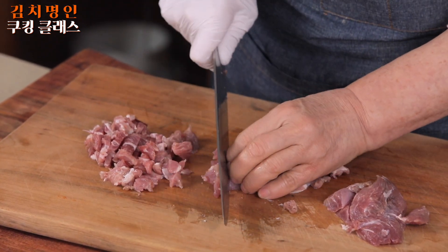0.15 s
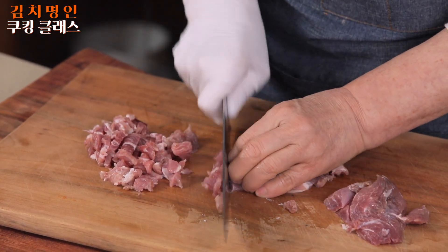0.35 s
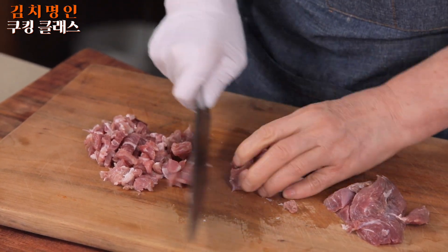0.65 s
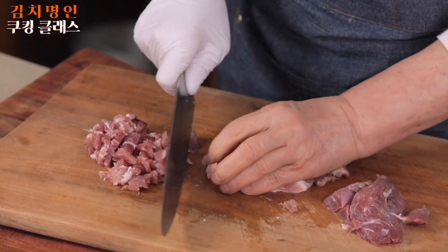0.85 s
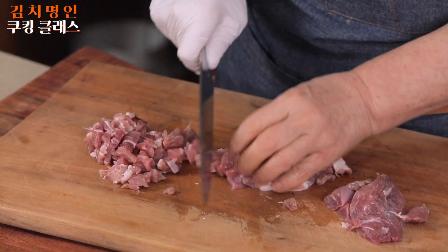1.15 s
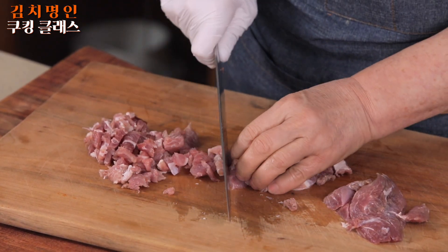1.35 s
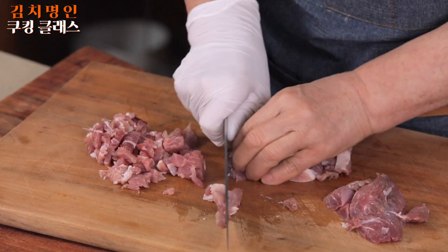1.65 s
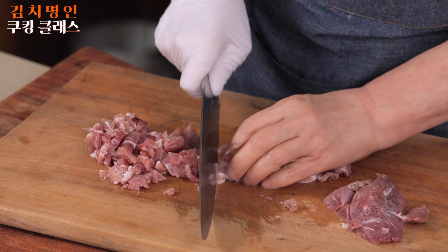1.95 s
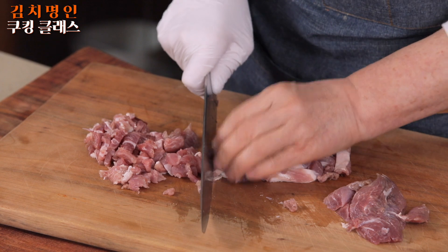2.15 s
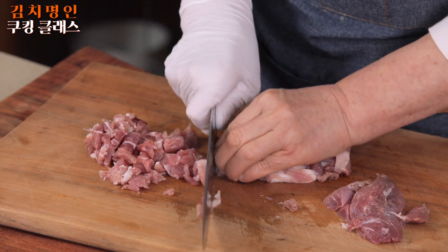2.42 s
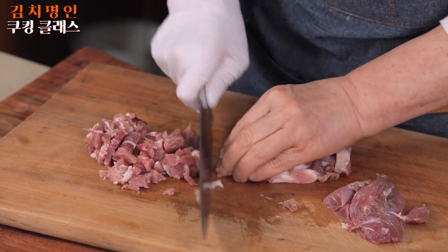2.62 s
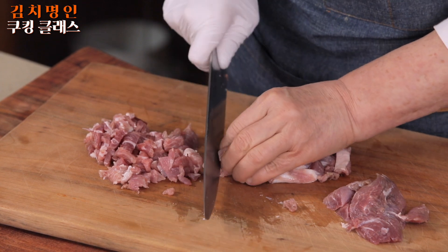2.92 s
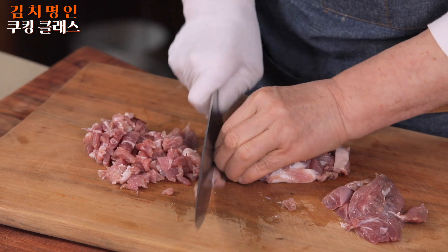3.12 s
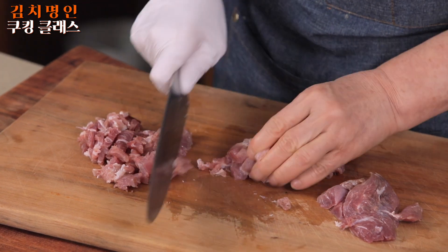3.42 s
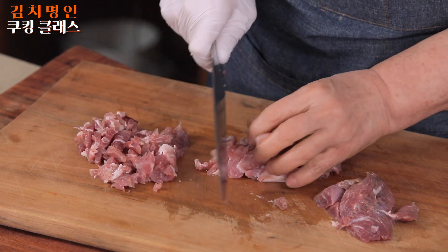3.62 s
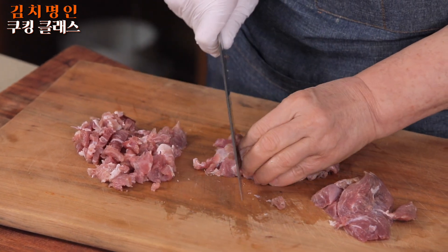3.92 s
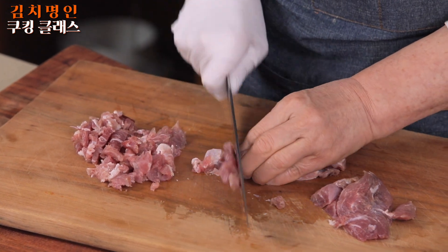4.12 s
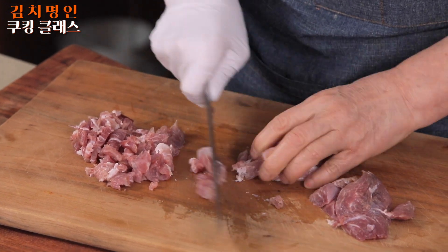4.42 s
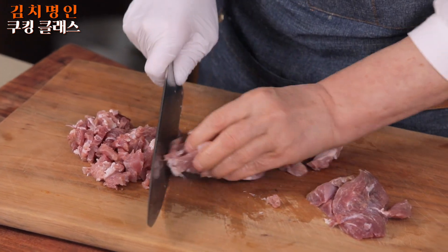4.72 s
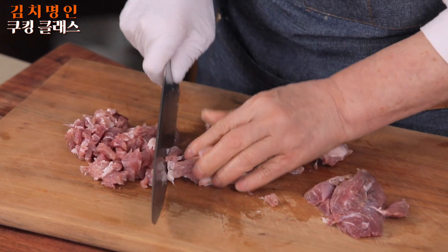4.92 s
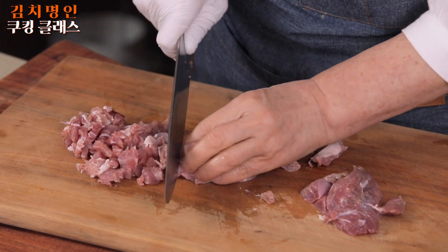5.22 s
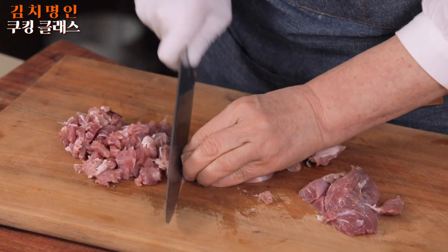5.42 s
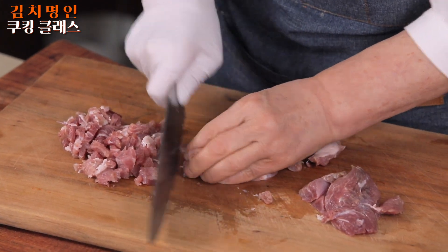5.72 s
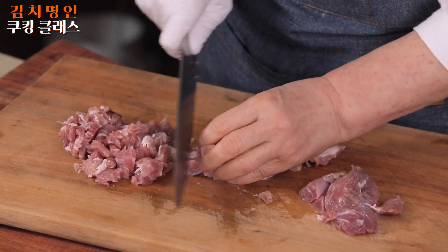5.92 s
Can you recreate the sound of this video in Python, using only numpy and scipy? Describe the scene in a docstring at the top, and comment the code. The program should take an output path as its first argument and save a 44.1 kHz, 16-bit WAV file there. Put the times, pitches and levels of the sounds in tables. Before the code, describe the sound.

Separate knife strokes on a wooden cutting board, miked closely with a short indoor reverberation. Each stroke sinks through soft meat with a slight crackle, knocks woodily, then drags roughly over the grain. Between the firm blows come light taps and gritty scrapes pushing pieces aside, some with a thin steely hiss. Soft ventilation air fills the gaps, including a long one before the last cut.

```python
"""A small kitchen, close up and almost mono: a cook dices raw meat on a thick wooden board.
Knocks ring the damped modes of the board, and the table answers with low thuds.
The blade rasps through meat and scrapes back: trains of tiny slips shake the wood and the steel.
Wet meat ticks and crackles in filtered noise; ventilation murmurs behind as noise and wavering tones."""
import sys
import numpy as np
from scipy import signal
from scipy.fft import rfft, irfft
from scipy.io import wavfile
from scipy.ndimage import map_coordinates

SR = 44100
rng = np.random.default_rng(int(sys.argv[2]) if len(sys.argv) > 2 else 0)


def unload_wav(signal):
    """Save mono or channel-first audio to the path in sys.argv[1] as 16-bit WAV at rate SR, clipped to [-1, 1]."""
    wavfile.write(
        sys.argv[1],
        SR,
        np.round(np.clip(np.atleast_2d(signal).T, -1, 1) * 32767).astype(np.int16),
    )


N = 267246  # length in samples

# Spectrum of the ventilation air. Each row: frequency in Hz, relative density in dB.
AIR_SPECTRUM = [(25, -3.5), (90, -9.5), (200, -11.5), (400, -7.5), (700, -9.5), (1300, -9.5), (1900, -20),
                (4000, -23), (15500, -24.5)]
# Ventilation tones. Each row: centre frequency in Hz, relative level in dB.
FAN_TONES = [(118.4, -83), (339.1, -80.5), (699.8, -72), (952.8, -78.5), (1357, -80)]
# Early reflections from the worktop and the cook's body. Each row: delay in seconds, level in dB.
ECHOES = [(.0053, -15.5), (.0107, -13.5)]
# Modes of the table under the board. Each row: frequency in Hz, level in dB, T60 in seconds.
TABLE_MODES = [(39.2, -6.5, 0.2), (69, 1, 0.11), (87, -3, 0.073), (164, -4.5, 0.065)]
# Modes of the board. Each row: nominal frequency in Hz, nominal level in dB, T60 in seconds.
BOARD_MODES = [(182, -28, 0.056), (372.3, -23, 0.17), (448.6, -18.5, 0.28), (540, -16, 0.041),
               (558, -5, 0.084), (605.8, -4.5, 0.088), (663.5, -6.5, 0.053), (936, -20, 0.049),
               (1070.3, -7, 0.056), (1042, -6.5, 0.05), (1187, -7.5, 0.035), (1173, -12, 0.096),
               (1337, -9, 0.028), (1392, -18, 0.16), (1543, -35, 0.17), (1649, -9.5, 0.034),
               (2050, -27, 0.076), (2010, -24, 0.064), (2370, -40, 0.082), (2810, -25, 0.048)]
# Resonances of blade and board under friction. Each row: nominal centre in Hz, width in Hz,
# nominal lift in dB.
BLADE_PEAKS = [(1105, 70, 3.5), (1411, 20, 13), (1699, 74, 7.5), (2393, 320, 8), (3134, 260, 8),
               (3745, 510, 2.5), (4340, 18, 2), (5420, 1000, 6.5), (6150, 135, 9), (6640, 116, 8),
               (7880, 110, 0), (9470, 67, 6.5), (11600, 200, 7), (13100, 110, 7.5), (13800, 340, 4)]
# Spectrum of the edge rasping. Each row: frequency in Hz, relative density in dB.
RASP_SPECTRUM = [(150, -2), (500, -6), (850, 1.5), (1200, 5.5), (2200, -2.5), (3300, -7), (4500, -9.5),
                 (7000, -26.5), (15000, -46)]
# Spectrum of the steel hissing. Each row: frequency in Hz, relative density in dB.
HISS_SPECTRUM = [(500, -15), (1400, -5), (3000, -7), (5000, -7), (7000, 0), (8500, -1), (12000, -1.5),
                 (16000, 1.5)]
# Spectrum of the edge cracking on wood. Each row: frequency in Hz, relative density in dB.
CRACK_SPECTRUM = [(100, 6), (300, -1.5), (800, -18), (1400, 1), (2800, -4.5), (4200, -14), (7000, -20.5),
                  (15000, -35)]
# Wet meat sticks to the steel and lets go. Each row: start in seconds, relative level in dB,
# centre in Hz.
TICKS = [(0.179, -49, 8020), (0.263, -41, 3270), (0.565, -43, 3670), (0.7939, -41, 2900),
         (1.5668, -36, 3040), (2.227, -43, 14200), (2.3193, -40, 3040), (2.6707, -41.5, 6150),
         (3.055, -37, 6200), (3.1571, -32.5, 2620), (3.3413, -37, 6700), (4.013, -43, 2950),
         (6.012, -38, 6500)]
# The pressed edge sticks and slips in the wood. Each row: start in seconds, length in seconds,
# level in dB, first pitch in Hz, last pitch in Hz.
SQUEAKS = [(0.383, 0.106, -42, 728, 682), (.660, 0.076, -50.5, 1404, 1480), (2.416, 0.05, -40, 740, 680),
           (5.550, 0.12, -44, 967, 668)]
# Forward cuts. Each row: start, rise and fall in seconds, relative levels in dB of the drag on the wood,
# the rasp of the edge and the hiss of the steel, singing resonance in Hz, table rumble in dB,
# lag of the drag in seconds, relative level of the meat parting in dB.
CUTS = [(0.285, 0.08, 0.12, -42, -38.5, -48.5, 2400, -56, 0.13, -56),
        (1.455, 0.044, 0.077, -44, -47, -55, 1640, -64, -0.0059, -66),
        (1.632, 0.0091, 0.067, -39.5, -41.5, -53, 1660, -54, 0.0037, -59.5),
        (2.386, 0.047, 0.081, -41.5, -44, -52.5, 4300, -57, 0.0051, -57.5),
        (3.157, 0.021, .075, -39, -44.5, -46, 2150, -52, 0.038, -57),
        (4.078, 0.033, .11, -48.5, -42, -55, 3140, -64, 0.054, -56),
        (4.253, .006, 0.069, -46, -46, -57.5, 1700, -62, 0.047, -55),
        (5.477, 0.031, 0.12, -38, -36.5, -44.5, 3150, -60, .07, -53)]
# The blade scrapes the pieces aside. Each row: start, rise and fall in seconds, relative levels in dB of
# the drag, the rasp and the hiss, singing resonance in Hz, swell in dB.
SCRAPES = [(0.579, 0.042, 0.11, -48, -53, -60, 2450, 3), (.612, 0.096, 0.044, -52, -47, -41, 3720, 22.5),
           (1.873, 0.038, 0.15, -51.5, -53.5, -58.5, 2400, 3),
           (2.546, 0.063, .11, -44.5, -45.5, -55, 1760, 14), (2.674, 0.013, 0.02, -60, -65, -50, 6150, 3),
           (3.1, 0.024, 0.022, -45, -58, -62, 2150, 16), (3.333, 0.0084, .025, -66, -47, -43, 2400, 8),
           (4.41, 0.077, 0.11, -48.5, -45.5, -49, 3000, 4),
           (5.722, 0.041, 0.029, -46.5, -54, -52, 2400, 10)]
# Blade meets wood. Each row: start in seconds, relative level in dB, contact cut-off in Hz,
# lift of the upper board modes in dB, crack of the edge in dB, weight on the table in dB.
KNOCKS = [(.263, -24, 950, -7, -20, -36), (0.283, -3.5, 1570, -1.5, -16, -18),
          (0.419, -32, 900, -12, -22, -9), (0.996, -3.5, 1540, 1.5, -30, -13),
          (1.164, -30, 1700, 5.5, -5, -36), (1.4543, -8.5, 810, -1.5, -35, -27),
          (1.6293, -0.5, 1580, -8, -6.5, 0.5), (2.321, -25.5, 1210, -10, -4.5, -30),
          (2.386, -18.5, 930, -7, -20, -22), (2.538, -26, 900, -12, -20, -13.5),
          (3.054, -28, 1200, -6, -4, -30), (3.159, -5.5, 1800, -8.5, -8.5, -4.5),
          (3.3257, -26, 1200, -4, -8, -12), (4.052, -25.5, 1000, -8, -9, -32),
          (4.0755, -14, 930, -2.5, -5.5, -32), (4.2503, 2, 1790, 1.5, -10.5, -3.5),
          (4.4142, -15.5, 940, -7, -21, -24), (5.476, -4.5, 1680, -6.5, -7, -44)]

AIR_DB = -62.5
ROOM_T60_S, ROOM_TREBLE_T60_S, ROOM_DB = 0.42, 0.36, -9.5
TOP_HZ = 15950
# every stroke bites, swells to its fullest, eases off and lets go; SWELL_DB is for cuts
BITE_S, SWELL_DB, EASE_DB, RELEASE_DB_PER_S = 0.0044, 9, 16.5, 269
# steady part of the hiss: very faint and constant, with the blade's resonances, under everything
STEADY_HISS_DB = -87.5
# wet fibres snap while the edge sinks in: level against the parting strength, mean snaps per second
SNAPS_DB, SNAPS_PER_S = -1.5, 160
# the sinking edge: speed of its swell, then its share in drag, rasp and hiss
SINK_DB_PER_S, SINK_DRAG_DB, SINK_RASP_DB, SINK_HISS_DB = 140, 1.5, -3, -2
# rumble of a scrape against its drag, singing of a stroke against its rasp
SCRAPE_RUMBLE_DB, SING_DB = -9.5, -8


def undb(db):
    """Decibels to gain."""
    return 10 ** (np.asarray(db) / 20)


def unit(x):
    """Scale to rms 1."""
    return x / np.sqrt(np.mean(x ** 2))


def seconds(length):
    """Time axis of a given length."""
    return np.arange(int(length * SR)) / SR


def add(track, s, sound):
    """Mix a sound in at a time in seconds."""
    i = int(s * SR)
    track[i:i + len(sound)] += sound[:N - i]


def lowpass(x, hz, order=2):
    """Butterworth low-pass."""
    sos = signal.butter(order, min(hz, SR / 2 - 1), fs=SR, output="sos")
    return signal.sosfilt(sos, x)


def highpass(x, hz, order=2):
    """Butterworth high-pass."""
    return signal.sosfilt(signal.butter(order, hz, "high", fs=SR, output="sos"), x)


def through(x, response):
    """Pass a sound through an impulse response."""
    return signal.fftconvolve(x, response)[:len(x)]


def colour(x, points, peaks=(), size=8192):
    """Minimum-phase filter from a smooth spectrum with resonances standing on it."""
    f = np.arange(size // 2 + 1) * SR / size + 1e-3
    hz, db = np.transpose(points)
    curve_db = np.interp(np.log(f), np.log(hz), db)
    for centre, width, lift in peaks:
        curve_db = curve_db + lift / (1 + (2 * (f - centre) / width) ** 2)
    # folding the cepstrum makes the filter causal
    cepstrum = irfft(np.log(undb(curve_db)))
    cepstrum[1:size // 2] *= 2
    cepstrum[size // 2 + 1:] = 0
    return through(x, irfft(np.exp(rfft(cepstrum))))


def spread(x, hz, sharpness=1.3):
    """All-pass: bending waves near one frequency reach the surface a little later."""
    b, a = signal.iirpeak(hz, sharpness, fs=SR)
    return x - 2 * signal.lfilter(b, a, x)


def glide(x, speed):
    """Slide all resonances of a sound by a moving factor."""
    return map_coordinates(x, [np.cumsum(speed)], order=3, mode="wrap")


def fade(t, t60):
    """Exponential decay by 60 dB in t60 seconds."""
    return np.exp(-np.log(1000) * t / t60)


def ring(modes, upper_db=0, split_hz=850):
    """Impulse response of damped modes, with those above the split lifted."""
    t = seconds(.5)
    response = np.zeros(len(t))
    for hz, db, t60 in modes:
        gain = undb(db + upper_db * (hz > split_hz))
        response += gain * fade(t, t60) * np.sin(2 * np.pi * hz * t)
    return response


def walk(rate):
    """Random wander of rms 1, with a new target rate times a second."""
    knots = rng.standard_normal(int(N / SR * rate) + 2)
    return unit(np.interp(np.arange(N) / SR * rate, np.arange(len(knots)), knots))


def grains(rate, spread_db):
    """A random train of tiny slips, a few much stronger than the rest."""
    sizes = undb(spread_db * np.minimum(rng.exponential(size=N), 5))
    return (rng.random(N) < rate / SR) * sizes * rng.choice([-1, 1], N)


def patchy(x, depth_db=2.6, rate=22, low_hz=900, step_octaves=0.485, count=9):
    """Bands about half an octave apart swell and fade by themselves as the point of contact moves."""
    spectrum = rfft(x)
    octaves = np.log2((np.arange(len(spectrum)) + 1) * SR / N / low_hz)
    place = np.clip(octaves / step_octaves, 0, count - 1)
    out = np.zeros(N)
    for k in range(count):
        band = irfft(spectrum * np.maximum(1 - np.abs(place - k), 0), N)
        out += band * undb(depth_db * walk(rate))
    return unit(out)


def background(tones_db=0.5, waver_db=-0.24, side_db=-71, wow=0.00082):
    """Ventilation air and wavering tones in the middle; a faint hiss of opposite sign in each channel."""
    air = undb(AIR_DB + waver_db * walk(2.78)) * unit(colour(rng.standard_normal(N), AIR_SPECTRUM))
    tones = np.zeros(N)
    for hz, db in FAN_TONES:
        cycles = hz * np.cumsum(1 + wow * walk(40.24)) / SR
        tones += undb(db + tones_db) * unit(np.sin(2 * np.pi * cycles))
    side_spectrum = [(120, 10.5), (600, 6.5), (1300, -5), (3000, 8.0)]  # Hz, dB
    side = undb(side_db) * unit(colour(rng.standard_normal(N), side_spectrum))
    return air + tones + side * np.array([[1], [-1]])


def kitchen(x, build_s=0.0074, split_hz=2000):
    """Two close reflections and a short diffuse reverberation that dies sooner in the treble."""
    t = seconds(.7)
    noise = rng.standard_normal(len(t))
    low = lowpass(noise, split_hz, order=1)
    decay = low * fade(t, ROOM_T60_S) + (noise - low) * fade(t, ROOM_TREBLE_T60_S)
    tail = decay * (1 - np.exp(-(t / build_s) ** 2))
    out = x + undb(ROOM_DB) * through(x, tail / np.linalg.norm(tail))
    for delay, db in ECHOES:
        add(out, delay, undb(db) * x)
    return out


def parting():
    """Strength of the edge sinking through the meat: it swells up to the start of each cut."""
    t = np.arange(N) / SR
    out = np.zeros(N)
    for s, *_, db in CUTS:
        out += undb(db - SINK_DB_PER_S * np.abs(s - t)) * np.clip((s - t) / BITE_S, 0, 1)
    return out


def strokes():
    """Cuts and scrapes alike: (s, rise, fall, drag, rasp, hiss, singing Hz, rumble, lag, swell)."""
    cuts = [(*cut[:-1], SWELL_DB) for cut in CUTS]
    scrapes = []
    for s, rise, fall, drag, rasp, hiss, hz, swell in SCRAPES:
        scrapes.append((s, rise, fall, drag, rasp, hiss, hz, drag + SCRAPE_RUMBLE_DB, 0, swell))
    return cuts + scrapes


def stroke(s, rise, fall, swell_db, lag=0):
    """Pressure of one stroke; a positive lag moves its fullest moment towards the end."""
    t = np.arange(N) / SR - s
    end = rise + fall
    fullest = np.clip(rise + lag, .002, end - .01)
    swelling_db = swell_db * np.clip(1 - t / fullest, 0, 1) ** 2
    easing_db = EASE_DB * np.clip((t - fullest) / (end - fullest), 0, 1) ** 2
    release_db = RELEASE_DB_PER_S * np.maximum(t - end, 0)
    return np.clip(t / BITE_S, 0, 1) * undb(-swelling_db - easing_db - release_db)


def pressures(drag_focus=1.05):
    """Strength of drag, rasp, hiss and rumble; drag and rumble lean towards the high pressures."""
    drag, rasp, hiss, rumble = np.zeros((4, N))
    for s, rise, fall, drag_db, rasp_db, hiss_db, _, rumble_db, lag, swell_db in strokes():
        on_edge = stroke(s, rise, fall, swell_db)
        on_wood = stroke(s, rise, fall, swell_db, lag) ** drag_focus
        drag += undb(drag_db) * on_wood
        rasp += undb(rasp_db) * on_edge
        hiss += undb(hiss_db) * on_edge
        rumble += undb(rumble_db) * on_wood ** 2
    sinking = parting()
    drag += undb(SINK_DRAG_DB) * sinking
    rasp += undb(SINK_RASP_DB) * sinking
    hiss += undb(SINK_HISS_DB) * sinking + undb(STEADY_HISS_DB)
    return drag, rasp, hiss, rumble


def thuds(rumble, level_db=-33, push_hz=130, rattle_db=-3, rattle_t60=0.54, late_s=0.0038):
    """The hand's weight rocks the table just after each knock; noise through its modes rumbles in strokes."""
    out, t, table = np.zeros(N), seconds(.5), ring(TABLE_MODES)
    for s, *_, weight_db in KNOCKS:
        shaken = through(rng.standard_normal(len(t)), table)
        shudder = unit(lowpass(shaken, 2 * push_hz)) * fade(t, rattle_t60)
        thud = lowpass(table, push_hz) + undb(rattle_db) * shudder
        add(out, s + late_s, undb(weight_db + level_db) * thud)
    shaking = unit(lowpass(through(rng.standard_normal(N), table), 2 * push_hz))
    return out + rumble * shaking


def ticks(level_db=-6.5, t60=0.017, skirt_db=-12, stray_db=-76):
    """Wet surfaces part with short snaps; a faint crackle runs throughout and grows as the edge sinks in."""
    out, t = np.zeros(N), seconds(0.063)
    for s, db, hz in TICKS:
        spectrum = [(hz / 10, 2 * skirt_db), (hz, 0), (hz * 4, skirt_db)]
        snap = colour(rng.standard_normal(len(t)), spectrum, BLADE_PEAKS)
        add(out, s, undb(db + level_db) * unit(snap) * fade(t, t60))
    snaps = grains(rate=SNAPS_PER_S, spread_db=2.5)
    crackle = highpass(colour(snaps, HISS_SPECTRUM, BLADE_PEAKS), 2000)
    strength = undb(stray_db) + undb(SNAPS_DB) * parting()
    return out + strength * patchy(crackle, depth_db=4, rate=87)


def squeaks(cycles=22):
    """Stick and slip ring one resonance, which shifts as more of the edge lies on the wood."""
    out = np.zeros(N)
    for s, length, db, first_hz, last_hz in SQUEAKS:
        progress = seconds(length) / length
        slips = grains(rate=1700, spread_db=4.0)[:SR]
        tone = through(slips, ring([(first_hz, 0, cycles / first_hz)]))
        steady = highpass(tone, first_hz / 2)[SR // 2:]  # skip the build-up
        tone = glide(steady, (last_hz / first_hz) ** progress)
        add(out, s, undb(db) * np.sin(np.pi * progress) * unit(tone))
    return out


def singing(cycles=18, focus=1.5, wander=.02):
    """Each stroke brings out one blade resonance of its own while the pressure is high."""
    out, drift = np.zeros(N), 1 + wander * walk(14)
    for s, rise, fall, _, rasp_db, _, hz, _, _, swell_db in strokes():
        span = slice(int(s * SR), int(s * SR) + SR // 2)
        slips = grains(rate=1800, spread_db=2.5)[span]
        tone = highpass(through(slips, ring([(hz, 0, cycles / hz)])), hz / 2)
        pressure = stroke(s, rise, fall, swell_db)[span] ** focus
        out[span] += undb(rasp_db + SING_DB) * pressure * unit(glide(tone, drift[span]))
    return out


def slicing(drag, rasp, hiss, drag_db=-4.5, rasp_db=-2.5, hiss_db=-2, catch_db=1.92, catch_rate=60,
            clump_db=1.5, clump_rate=25, corner_hz=430):
    """The edge slips over wood fibres and sinew in uneven catches, shaking both board and blade."""
    slips = grains(rate=4000, spread_db=2.6)
    # the blade's resonances drift as the point of contact travels along it
    drift = 1 + .016 * walk(14)
    wood = unit(highpass(through(slips, ring(BOARD_MODES, upper_db=-1)), corner_hz))
    edge = patchy(glide(colour(slips, RASP_SPECTRUM, BLADE_PEAKS), drift))
    edge = edge * undb(clump_db * walk(clump_rate))
    # clear of the meat, the steel rings more freely
    free_blade = [(hz, width, 1.3 * lift) for hz, width, lift in BLADE_PEAKS]
    fine_slips = grains(rate=9000, spread_db=3.5)
    steel = patchy(glide(colour(fine_slips, HISS_SPECTRUM, free_blade), drift))
    grip = undb(catch_db * walk(catch_rate))
    friction = undb(drag_db) * drag * wood + undb(rasp_db) * rasp * edge
    return grip * friction + undb(hiss_db) * hiss * steel


def knocks(wood_db=-18.5, crack_db=-23.5, crack_t60=0.056, slow_hz=650, spot_db=1.1, detune=0.0073,
           corner_hz=490, reach_octaves=0.6):
    """The edge lands on the board; meat under it lengthens the contact and dulls the blow."""
    out, t = np.zeros(N), seconds(0.21)
    for s, db, contact_hz, upper_db, edge_db, weight_db in KNOCKS:
        # each spot on the board favours slightly different modes
        modes = []
        for hz, mode_db, t60 in BOARD_MODES:
            spot_hz = hz * (1 + detune * rng.standard_normal())
            modes.append((spot_hz, mode_db + spot_db * rng.standard_normal(), t60))
        wood = spread(lowpass(ring(modes, upper_db), contact_hz, order=4), slow_hz)
        crack = unit(colour(rng.standard_normal(len(t)), CRACK_SPECTRUM)) * fade(t, crack_t60)
        # a heavy landing moves the whole board and reaches lower than a touch of the tip
        reach_hz = corner_hz / 2 ** (reach_octaves * undb(weight_db) ** 2)
        add(out, s, undb(db + wood_db) * highpass(wood, reach_hz))
        add(out, s, undb(db + edge_db + crack_db) * crack)
    return out


def scene():
    """Blade, board and meat sound into the small room; table thuds and ventilation join without its echo."""
    drag, rasp, hiss, rumble = pressures()
    work = knocks() + slicing(drag, rasp, hiss) + singing() + squeaks() + ticks()
    return kitchen(work) + thuds(rumble) + background()


def record(dry):
    """The recorder trims the deepest rumble and cuts the top steeply."""
    trimmed = highpass(dry, 36.3, order=5)
    return signal.sosfilt(signal.ellip(10, .1, 70, TOP_HZ, fs=SR, output="sos"), trimmed)


dry = scene()
out = record(dry)
unload_wav(out)
```